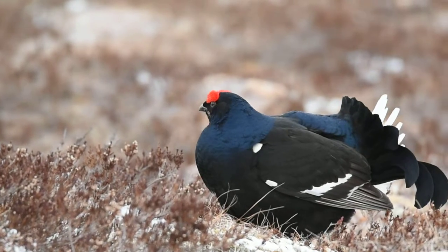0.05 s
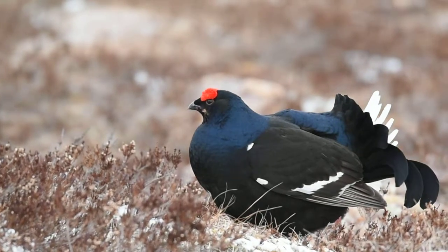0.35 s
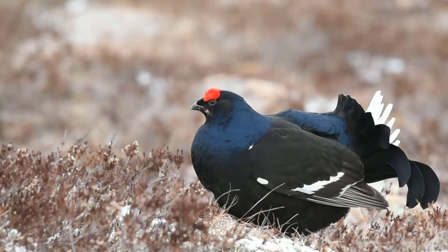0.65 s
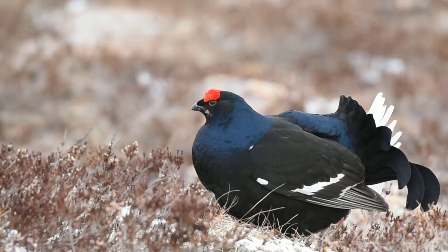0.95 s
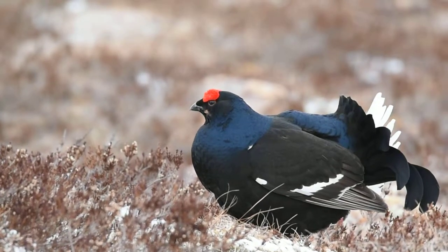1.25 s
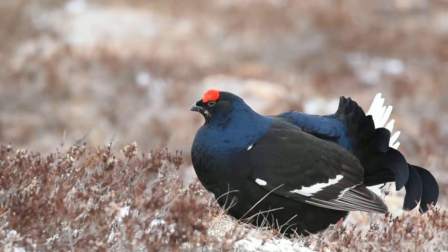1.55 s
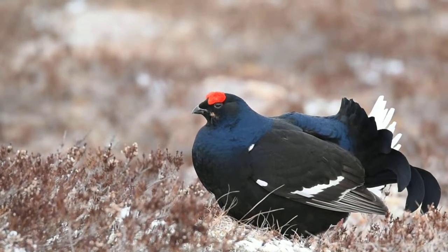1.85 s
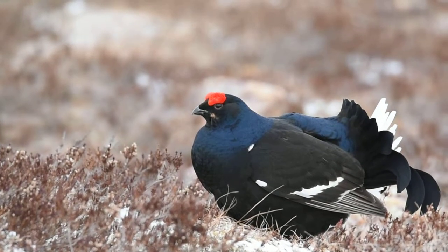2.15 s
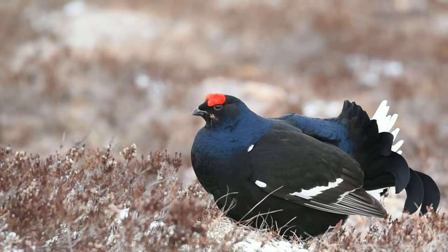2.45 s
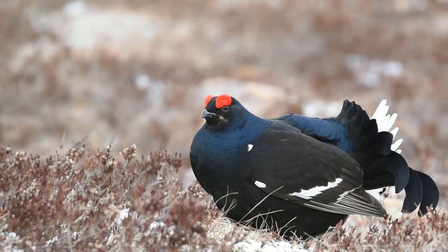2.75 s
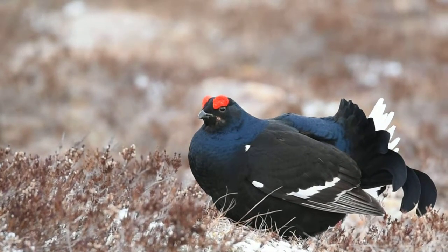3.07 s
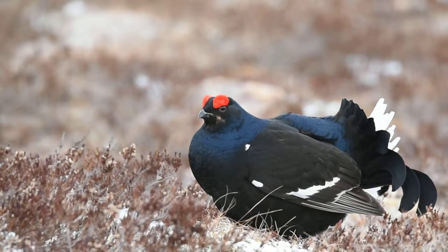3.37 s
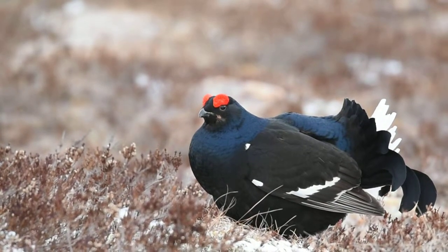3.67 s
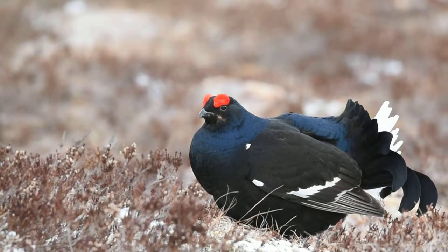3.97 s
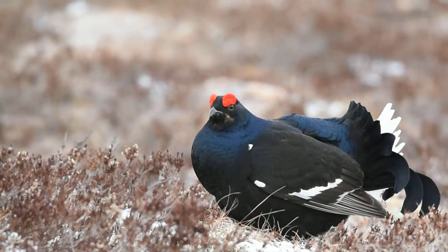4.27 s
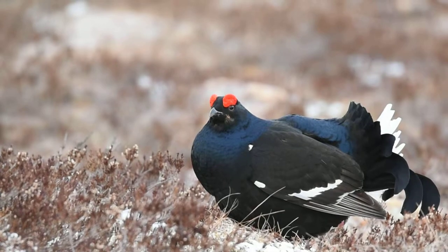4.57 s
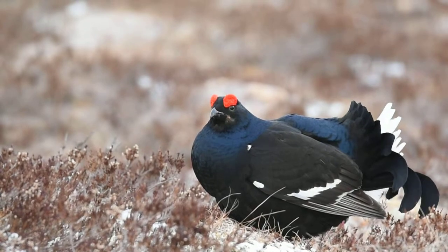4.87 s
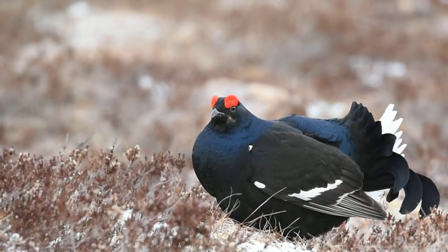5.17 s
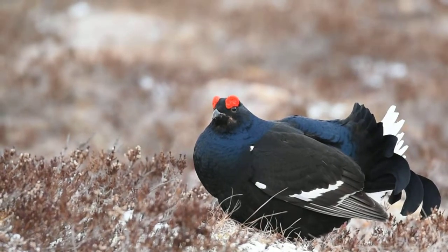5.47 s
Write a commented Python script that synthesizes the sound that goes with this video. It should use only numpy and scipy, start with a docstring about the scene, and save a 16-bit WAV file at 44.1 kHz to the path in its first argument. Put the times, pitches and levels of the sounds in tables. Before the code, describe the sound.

Black grouse bubble with overlapping, wavering coos on open moorland, over a light breeze, faint heather rustles and soft hiss.

```python
"""Black grouse bubble on open moorland: short, almost pure coos that arch, fall and overlap,
each loudest where its pitch crosses the resonance of the inflated throat. Farther grouse murmur
behind them and a songbird chirps faintly. A breeze rumbles on the microphone and rustles the dry
heather; the rustle builds towards the end, with ticking twigs and a few soft knocks.
Under it all lie the recorder's hiss and a faint high buzz."""
import sys
import numpy as np
from scipy import signal
from scipy.io import wavfile

SR = 44100
rng = np.random.default_rng(int(sys.argv[2]) if len(sys.argv) > 2 else 0)


def pcm_store(signal):
    """Save signal as 16-bit PCM."""
    levels = np.round(np.clip(np.atleast_2d(signal), -1, 1) * 32767)
    wavfile.write(sys.argv[1], SR, levels.astype(np.int16).T)


N = 243431
TIME = np.arange(N) / SR

# Table levels are relative: the faders in scene() set the final balance.
# stereo width of the noise beds: f/Hz, left-right correlation
STEREO_LIKENESS = [(25, 0.14), (60, 0.8), (130, 0.68), (290, 0.79), (640, 0.41), (1400, 0.051), (3000, 0),
                   (15000, 0)]
# colour of the hiss: f/Hz, level/dB
HISS_SPECTRUM = [(600, 9.5), (1000, 5.5), (1400, 1.5), (3000, 0), (4800, 2), (6500, -7), (8500, 2),
                 (10500, -21), (12000, 0), (15700, -17.5)]
# treble resonances of the buzz: f/Hz, level/dB, t60/s
BUZZ_MODES = [(8580, 1, 0.019), (9260, 0, 0.015), (11150, -5, 0.013), (11460, -5, 0.013)]
# colour of the wind on the microphone: f/Hz, level/dB
RUMBLE_SPECTRUM = [(20, 2), (30, -9), (40, -11.5), (60, -3.5), (85, 0.5), (120, -2), (180, -3), (280, -5.5),
                   (450, -0.5), (700, -21), (1100, -19), (2000, -43)]
# envelope of that rumble: t/s, level/dB
RUMBLE_ENVELOPE = [(0, -59), (.9, -59), (1.9, -59.5), (3.4, -57.5), (4.6, -59.5), (5.52, -59)]
# the breeze slowly freshening in the heather: t/s, level/dB
BREEZE_ENVELOPE = [(0, -68.5), (.7, -69), (1.7, -71), (2.9, -66.5), (3.9, -67.5), (4.5, -63), (4.8, -64.5),
                   (5.15, -60.5), (5.52, -59.5)]
# gusts riding on the breeze: crest t/s, half width/s, boost/dB
GUSTS = [(1.17, 0.098, 5), (3.14, 0.14, 3), (3.54, 0.095, 5), (5.265, 0.076, 4.5), (5.424, 0.068, 5)]
# colour of the dry heather: f/Hz, level/dB
RUSTLE_SPECTRUM = [(300, 1), (700, 3), (1200, 2.5), (2500, 2.5), (4000, -2.5), (5000, 3.5), (7500, 7),
                   (9000, 6.5), (11000, -2), (13500, -3.5), (15700, -9)]
# dry twigs ticking: t/s, level/dB, low f/Hz, high f/Hz
TWIG_TICKS = [(1.135, -47, 3500, 14500), (1.171, -52, 4000, 14500), (1.613, -47.5, 4500, 11000),
              (2.43, -50, 1200, 9000), (2.662, -48, 4000, 13000), (3.067, -44, 1000, 5000),
              (3.584, -38.5, 2520, 13000), (3.797, -44.5, 4000, 11000), (3.824, -41, 8500, 10500),
              (3.898, -44.5, 7000, 10000), (3.976, -47, 5000, 10000), (4.096, -43.5, 6000, 11000),
              (4.219, -40, 7000, 11900), (4.322, -45, 6000, 10000), (4.359, -50, 5900, 15000),
              (4.438, -43.5, 4020, 9900), (4.585, -46, 4000, 14100), (5.298, -42, 3500, 14000),
              (5.389, -36.5, 5000, 11150), (5.448, -29, 1360, 2500)]
# soft knocks: t/s, thud level/dB, click level/dB
KNOCKS = [(3.066, -65, -54.5), (5.143, -58, -49), (5.205, -52, -57), (5.297, -61, -54), (5.403, -46.5, -50),
          (5.449, -46.5, -42), (5.501, -47.5, -59)]
# dull body of a knock: f/Hz, level/dB, t60/s
THUD_MODES = [(95, -30, 0.046), (199, -1, 0.047), (230, 1, 0.042)]
# woody attack of a knock: f/Hz, level/dB, t60/s
CLICK_MODES = [(784, 1, 0.012), (975, 3, 0.01), (1570, 5, 0.011), (2040, -16, 0.02), (2480, -4, 0.032)]
# thin high pips: t/s, length/s, f/Hz, level/dB
PIPS = [(0.016, 0.025, 10590, -61.5), (4.964, .021, 10650, -62)]
# a far songbird's chirps: t/s, length/s, start f/Hz, middle f/Hz, end f/Hz, level/dB
CHIRPS = [(2.74, 0.064, 7700, 8000, 8150, -68), (2.76, 0.096, 4750, 4900, 5150, -67),
          (3.108, .13, 8330, 7900, 7800, -62), (3.17, 0.1, 5100, 4900, 4680, -68)]
# contour that the soft filler coos follow: t/s, f/Hz, level/dB
MURMUR_CONTOUR = [(0, 469.4, -59), (.8, 507.4, -52), (1.199, 471.7, -56.5), (1.6, 377, -54.5),
                  (2.1, 411, -56), (2.5, 400, -56.5), (3.4, 440.5, -53), (4.3, 400, -58),
                  (4.8, 384.4, -59.5), (5.52, 355, -64)]
# grouse notes that slide down, often in quick runs: t/s, length/s, middle f/Hz, level/dB
SLURS = [(0.045, 0.018, 475, -45), (0.343, 0.053, 381, -43), (0.406, 0.057, 395.7, -44.5),
         (0.474, 0.019, 546, -42.5), (0.486, 0.044, 355.0, -47.5), (0.525, 0.024, 464, -47.5),
         (0.833, 0.047, 366.5, -42.5), (0.888, 0.054, 370, -44.5), (0.962, 0.052, 360, -43.5),
         (1.023, 0.047, 405, -43.5), (1.157, 0.029, 523, -44.5), (1.187, 0.022, 552, -41),
         (1.342, 0.034, 367.4, -41.0), (1.385, 0.07, 376, -47), (1.451, 0.04, 478, -45),
         (1.473, 0.064, 355, -46.5), (1.54, 0.067, 380.0, -44.5), (1.611, 0.062, 371.0, -44),
         (1.671, 0.066, 393, -45), (1.755, 0.062, 379, -43.5), (1.821, 0.076, 392.4, -44.0),
         (1.895, 0.067, 436, -44), (1.967, 0.061, 491.4, -42.5), (2.04, 0.048, 527.6, -43),
         (2.083, 0.026, 418, -41.5), (2.118, 0.042, 518.5, -40.5), (2.192, 0.02, 492, -38.0),
         (2.221, 0.052, 463, -51), (2.291, 0.032, 435.5, -47.5), (2.492, 0.026, 488.4, -38.5),
         (2.585, 0.022, 535, -34.0), (2.715, 0.043, 516, -41.5), (3.223, 0.017, 439.0, -42.5),
         (3.279, 0.032, 544, -37.5), (3.409, 0.021, 382, -43), (3.543, 0.03, 472, -42.5),
         (3.761, 0.022, 553, -38), (3.775, 0.029, 371, -41.5), (3.822, 0.0284, 472, -44.5),
         (3.826, 0.038, 353, -45.5), (3.892, 0.072, 344, -47.5), (3.968, 0.062, 365.5, -44.0),
         (4.046, 0.059, 364, -44.0), (4.118, 0.054, 377, -42.0), (4.119, 0.0223, 545, -43),
         (4.388, 0.033, 459, -42), (4.498, 0.031, 350.0, -45), (4.553, 0.065, 355, -47),
         (4.555, 0.051, 361.5, -48), (4.607, 0.026, 403, -46.5), (4.7, 0.059, 385.5, -51),
         (4.763, 0.034, 402.5, -46), (4.83, 0.051, 395, -46.5), (4.9, 0.044, 392, -43.5),
         (4.957, 0.029, 403, -48), (5.07, 0.054, 362, -45.5), (5.147, 0.041, 369, -44.5),
         (5.251, 0.046, 362, -49), (5.387, 0.049, 371, -46)]
# grouse notes that leap up and drop back: t/s, length/s, top f/Hz, level/dB
ARCHES = [(0.303, 0.13, 531.6, -48.5), (0.524, 0.14, 543.0, -51), (0.68, 0.049, 562, -47.5),
          (0.773, 0.031, 551, -39.5), (0.884, 0.029, 480, -43), (0.959, 0.071, 475.3, -47),
          (1.022, 0.044, 544, -47.5), (1.259, 0.081, 583, -44.5), (1.345, 0.067, 558, -48.5),
          (2.441, 0.081, 544.5, -42.5), (2.657, 0.09, 529, -46.5), (2.772, 0.0413, 523, -45),
          (2.851, 0.041, 549, -40.5), (2.892, 0.063, 540, -42), (2.964, 0.037, 522, -45.5),
          (3.105, 0.065, 538, -42.5), (3.183, 0.031, 543, -45), (3.359, 0.056, 587.7, -40.5),
          (3.441, 0.051, 543.5, -43.0), (3.5, 0.083, 588.0, -49.5), (3.69, 0.044, 540, -49.5),
          (3.954, 0.042, 519, -45.5), (4.187, 0.078, 589, -46.5), (4.29, 0.048, 547, -48.5),
          (4.336, 0.032, 517, -45.5)]
# brief loud blips in the grouse song, mostly where an arching coo begins or ends:
# t/s, length/s, middle f/Hz, level/dB
COO_BLIPS = [(0.001, 0.013, 450, -39), (0.096, 0.021, 453, -43), (0.151, 0.015, 440, -43.5),
             (0.18, 0.03, 428, -44), (0.23, 0.019, 432, -39.5), (0.28, 0.053, 409.5, -40.5),
             (0.571, 0.022, 457, -39), (0.656, 0.019, 444, -40), (0.702, 0.014, 440, -36.5),
             (0.738, 0.029, 447, -44), (0.767, 0.043, 418.5, -40), (0.977, 0.012, 440, -38.5),
             (1.086, 0.016, 484, -40), (1.276, 0.039, 419, -39.5), (2.157, 0.03, 445, -43),
             (2.446, 0.012, 438, -44), (2.682, 0.02, 464, -42), (2.769, 0.021, 414, -41),
             (2.813, 0.022, 425.0, -38), (2.951, 0.016, 430, -38.5), (3.033, 0.024, 433, -45.5),
             (3.078, 0.018, 415, -44), (3.496, 0.021, 480, -39), (3.59, 0.017, 437, -37.5),
             (3.622, 0.027, 452, -39.0), (3.673, 0.016, 450, -36.5), (3.709, 0.04, 431, -44),
             (3.934, 0.022, 462, -40), (4.016, 0.014, 457, -37.5), (4.188, 0.051, 387.0, -51),
             (4.246, 0.014, 469, -43), (4.284, 0.017, 438, -39.5), (4.433, 0.045, 376, -42),
             (5.013, 0.051, 381, -42), (5.339, 0.036, 369, -46.5)]


def from_db(db):
    """Decibels to gain."""
    return 10 ** (np.asarray(db) / 20)


def unit_rms(x):
    """Normalise to rms 1."""
    return x / np.sqrt(np.mean(x ** 2) + 1e-20)


def automation(points):
    """Breakpoints joined into a curve over the whole scene."""
    return np.interp(TIME, *np.transpose(points))


def at_hz(points, hz):
    """Read a curve on a log-frequency axis."""
    freqs, values = np.transpose(points)
    return np.interp(np.log(hz), np.log(freqs), values)


def pan(left_db):
    """Channel gains with the left louder by left_db."""
    return from_db(np.array([[.5], [-.5]]) * left_db)


def from_left(x, left_db, lag_s=.00022):
    """Pan a sound that reaches the left microphone first."""
    late = np.interp(TIME - lag_s, TIME, x, left=0)
    return np.array([x, late]) * pan(left_db)


def add(track, s, sound):
    """Mix a sound into a track at time s."""
    start = int(np.clip(s * SR, 0, N - 1))
    track[..., start:start + sound.shape[-1]] += sound[..., :N - start]


def band(x, low_hz, high_hz):
    """Gentle band-pass."""
    return signal.sosfilt(signal.butter(2, [low_hz, high_hz], "band", fs=SR, output="sos"), x + 1e-18)


def drift(rate_hz):
    """Smooth random modulation with a spread of about 1."""
    hop, run_in = 40, 2000
    pole = np.exp(-2 * np.pi * rate_hz * hop / SR)
    noise = rng.standard_normal(N // hop + run_in + 2)
    slow = signal.lfilter([1], [1, -2 * pole, pole * pole], noise)[run_in:]
    return np.interp(np.arange(N) / hop, np.arange(len(slow)), unit_rms(slow))


def ring(clicks, modes):
    """Clicks set decaying sines ringing."""
    out = 0
    for hz, db, t60 in modes:
        decay, angle = np.exp(-np.log(1000) / (t60 * SR)), 2 * np.pi * hz / SR
        feedback = [1, -2 * decay * np.cos(angle), decay * decay]
        out = out + from_db(db) * signal.lfilter([0, np.sin(angle)], feedback, clicks + 1e-18)
    return out


def noise_bed(spectrum, flicker_db, grain=1):
    """Stereo noise in narrow bands, each with its own level, flicker and width; rms 1."""
    edges = np.geomspace(20, 17000, 29)
    white, out = rng.standard_normal((2, 2, N)) * grain, 0
    for k, (low, high) in enumerate(zip(edges, edges[1:])):
        if high < spectrum[0][0] or low > spectrum[-1][0]:
            continue
        hz = np.sqrt(low * high)
        mid, side = band(white[k % 2], low, high)
        alike = at_hz(STEREO_LIKENESS, hz)
        gain = from_db(at_hz(spectrum, hz) + flicker_db * drift(18.3))
        out = out + gain * (np.sqrt(1 + alike) * mid + np.sqrt(1 - alike) * side * [[1], [-1]])
    return unit_rms(out)


def progress(length):
    """Ramp from -1 to 1 through a note."""
    return np.linspace(-1, 1, int(length * SR))


def tone(hz):
    """A sine that follows a pitch curve."""
    return np.sin(2 * np.pi * (np.cumsum(hz) / SR + rng.random()))


def electronic_buzz(ticks_per_s=59.94):
    """A steady train of tiny ticks rings high in the treble, over a narrow sheen of hiss."""
    ticks = np.diff(np.floor(TIME * ticks_per_s), prepend=0)
    sheen = unit_rms(band(rng.standard_normal((2, N)), 8400, 9700))
    return from_db(-77.5) * unit_rms(ring(ticks, BUZZ_MODES)) + from_db(-72.0) * sheen


def wind_rumble(swing_db, swing_hz):
    """Wind on the microphone: a low bed that swells and sinks at random."""
    level_db = automation(RUMBLE_ENVELOPE) + swing_db * drift(swing_hz)
    return from_db(level_db) * noise_bed(RUMBLE_SPECTRUM, flicker_db=1.5)


def breeze():
    """Gain of the breeze in the heather: a slow rise with bell-shaped gusts."""
    gusts_db = sum(db * np.exp(-((TIME - s) / width) ** 2) for s, width, db in GUSTS)
    return from_db(automation(BREEZE_ENVELOPE) + gusts_db)


def heather(grain_db, flutter_db):
    """Countless dry sprigs brush together in tiny uneven bursts."""
    grain = from_db(grain_db * np.clip(drift(700), -2.5, 2.5) + flutter_db * drift(27))
    return breeze() * noise_bed(RUSTLE_SPECTRUM, flicker_db=1.0, grain=grain)


def sprig_snaps(per_s, spread_db, fade_s):
    """Single sprigs crackle at random close to the grouse as it shifts its feet and feathers; the crackle
    swells and sinks with the breeze curve, and each dies within milliseconds."""
    triggers = rng.random(N) < per_s / SR
    sizes = from_db(spread_db * np.minimum(rng.exponential(1, N), 2.5))
    envelope = signal.lfilter([1], [1, -np.exp(-1 / (fade_s * SR))], triggers * sizes + 1e-18)
    return breeze() * band(envelope * rng.standard_normal(N), 2000, 13000)


def twigs(t60_s, scatter):
    """Each twig gives a brief bright crackle; the heather scatters part of it wide."""
    out, t = np.zeros((2, N)), TIME[:SR // 10]
    for s, db, low_hz, high_hz in TWIG_TICKS:
        burst = np.exp(-np.log(1000) * t / t60_s) * rng.standard_normal((2, len(t)))
        add(out, s, from_db(db) * band(burst, low_hz, high_hz))
    direct, scattered = out
    return from_left(direct, 13.0) + scatter * scattered * [[1], [-1]]


def knocks():
    """Light bumps close by: a dull thud with a woody click."""
    thuds, clicks = np.zeros((2, N))
    for s, thud_db, click_db in KNOCKS:
        add(thuds, s, from_db([thud_db]))
        add(clicks, s, from_db([click_db]))
    return ring(thuds, THUD_MODES) + ring(clicks, CLICK_MODES)


def pips():
    """Very short, thin, steady tones."""
    out = np.zeros(N)
    for s, length, hz, db in PIPS:
        t = TIME[:int(length * SR)]
        add(out, s, from_db(db) * signal.windows.tukey(len(t)) * np.sin(2 * np.pi * hz * t))
    return out


def songbird(waver):
    """Thin wavering whistles from far away, each bending smoothly through three pitches."""
    out, wobble = np.zeros(N), 1 + waver * drift(137)
    for s, length, *pitches, db in CHIRPS:
        u = np.linspace(0, 1, int(length * SR))
        hz = np.polyval(np.polyfit([0, .5, 1], pitches, 2), u)
        add(out, s, from_db(db) * np.sin(np.pi * u) * tone(hz * wobble[:len(u)]))
    return out


def ground_echoes(x, fade_s, count, mic_delay_s=0.00086):
    """Uneven ground scatters weak echoes, each arriving from its own direction."""
    out = np.zeros((2, N))
    for lag, direction in zip(rng.uniform(0.00823, .16, count), rng.uniform(0.057, 1, count)):
        echo = np.exp(-lag / fade_s) * x
        add(out[0], lag, echo)
        add(out[1], lag + direction * mic_delay_s, echo)
    return out / np.sqrt(count)


def far_grouse(low_hz, high_hz, length_s, fall, count):
    """Distant birds: a wash of falling coos."""
    out = np.zeros(N)
    for when, height, size in rng.random((count, 3)):
        hz = low_hz + height * (high_hz - low_hz)
        glide = 1 - fall * progress(length_s * (.5 + size))
        add(out, when * N / SR, coo(hz * glide))
    return unit_rms(out)


def coo(hz, swell_db=0, throat_hz=440, throat_q=2.0, quiver=.013, edge_s=0.0061):
    """A nearly pure, trembling glide, loudest where it passes the resonance of the inflated throat."""
    u, length = np.linspace(0, 1, len(hz)), len(hz) / SR
    tremble = np.interp(u, np.linspace(0, 1, 10), rng.standard_normal(10))
    hz = hz * (1 + quiver * tremble)
    gate = np.tanh(np.sin(np.pi * u) * length / (np.pi * edge_s))
    throat = 1 / np.hypot(1, throat_q * (hz / throat_hz - throat_hz / hz))
    return gate * throat * from_db(swell_db * (u - .5)) * tone(hz)


def slur(length, hz, fall=0.37, rest_hz=270, usual_s=0.051):
    """The voice slackens towards rest: the higher and longer the note, the further it falls."""
    fall_hz = fall * (hz - rest_hz) * np.sqrt(length / usual_s)
    return coo(hz - fall_hz * progress(length), swell_db=4.5)


def arch(length, top_hz, drop=0.282, flatness=2.73):
    """The pitch leaps through the throat's resonance, holds, and drops back through it."""
    return coo(top_hz * (1 - drop * np.abs(progress(length)) ** flatness))


def coo_blip(length, hz, sag=0.042):
    """A brief, slightly sagging blip: mostly the foot of an arch crossing the throat's resonance."""
    return coo(hz * np.exp(-sag * progress(length)))


def soft_coos(per_s, length_s, pitch_spread):
    """Softer slurs at loose intervals fill in under the song."""
    out = np.zeros(N)
    times, pitches, levels = np.transpose(MURMUR_CONTOUR)
    for k, (late, detune, stretch) in enumerate(rng.uniform(-1, 1, (int(per_s * N / SR), 3))):
        s = (k + .5 + late / 2) / per_s
        hz = np.interp(s, times, pitches) * (1 + pitch_spread * detune)
        gain = from_db(np.interp(s, times, levels))
        add(out, s, gain * slur(length_s * (1 + stretch / 2), hz))
    return out


def near_grouse():
    """The bubbling song up front: slurs and arches overlap, with loud blips and softer coos between."""
    out = soft_coos(per_s=18, length_s=0.0423, pitch_spread=0.081)
    for voice, rows in ((slur, SLURS), (arch, ARCHES), (coo_blip, COO_BLIPS)):
        for s, length, hz, db in rows:
            add(out, s, from_db(db) * voice(length, hz))
    return out


def scene():
    """The mix: grouse a little to the left, breeze all round."""
    song = from_db(1.5) * near_grouse()
    chorus = np.array([far_grouse(low_hz=323.8, high_hz=506.2, length_s=0.064, fall=0.16, count=150)
                       for side in range(2)])
    # the ground gives each microphone a slightly different share of every note
    grouse = from_left(song, left_db=drift(11))
    echoes = from_db(-2.5) * ground_echoes(song, fade_s=0.055, count=24)
    distant = from_db(-65.0) * chorus + from_db(-4) * songbird(waver=0.019)
    wind = wind_rumble(swing_db=0.8, swing_hz=10.6)
    rustle = from_db(4.0) * heather(grain_db=2.5, flutter_db=1.5) * pan(1.36)
    snaps = from_db(-1.5) * from_left(sprig_snaps(per_s=140, spread_db=2, fade_s=0.0035), 3.4)
    ticks = from_db(-4.5) * twigs(t60_s=0.026, scatter=0.47)
    hiss = from_db(-66) * noise_bed(HISS_SPECTRUM, flicker_db=1.8) * pan(0.28)
    bed = hiss + electronic_buzz() * pan(5.6) + wind + rustle
    details = snaps + ticks + from_left(knocks(), 0.32) + pips()
    return bed + details + distant + echoes + grouse


def record(dry):
    """Master EQ: a gentle low cut thins the deepest rumble, a steep high cut takes off the top."""
    thinned = signal.sosfilt(signal.butter(2, 28, "high", fs=SR, output="sos"), dry)
    return signal.sosfilt(signal.ellip(12, .1, 80, 15750, fs=SR, output="sos"), thinned)


dry = scene()
out = record(dry)
pcm_store(out)
```